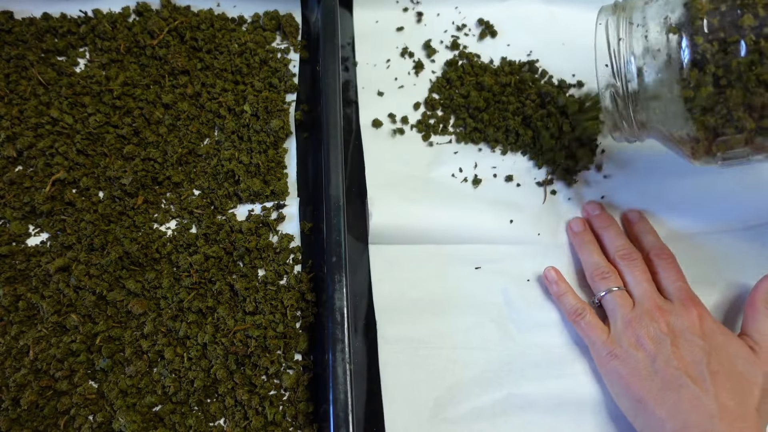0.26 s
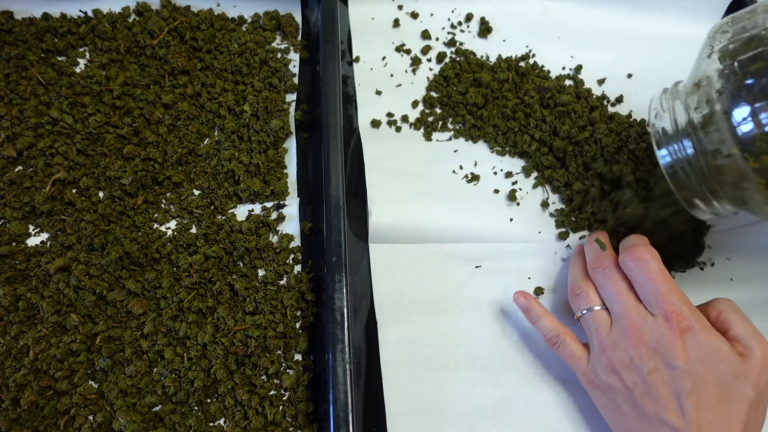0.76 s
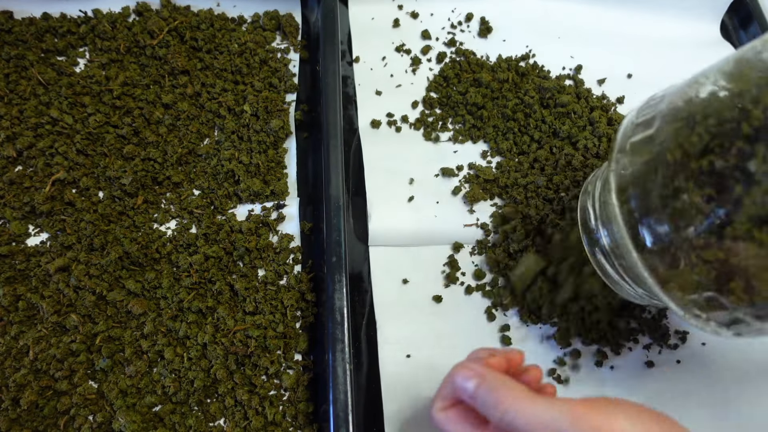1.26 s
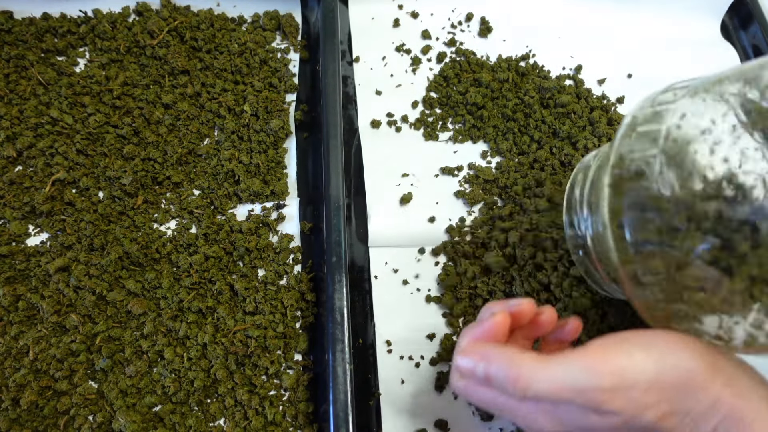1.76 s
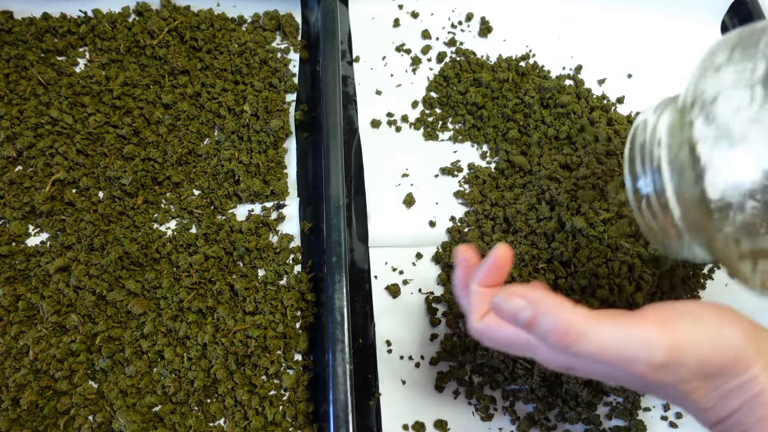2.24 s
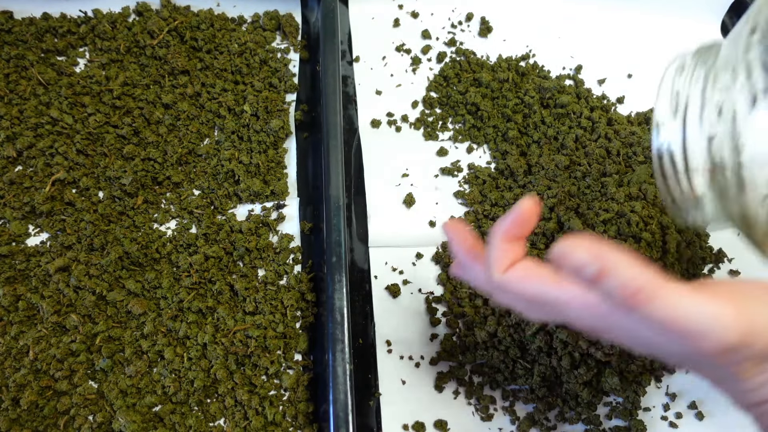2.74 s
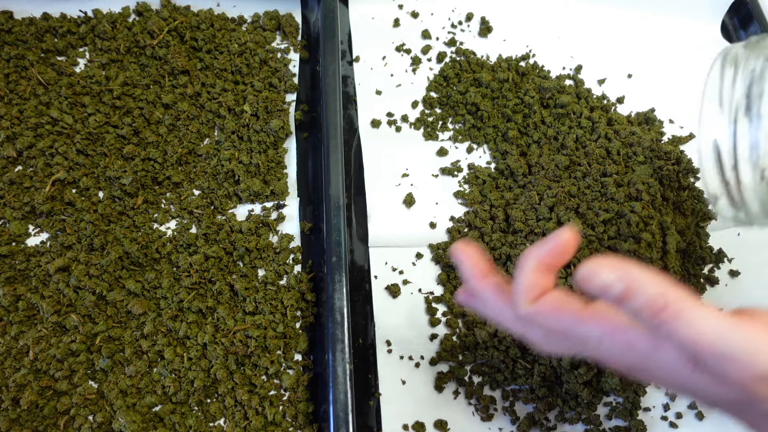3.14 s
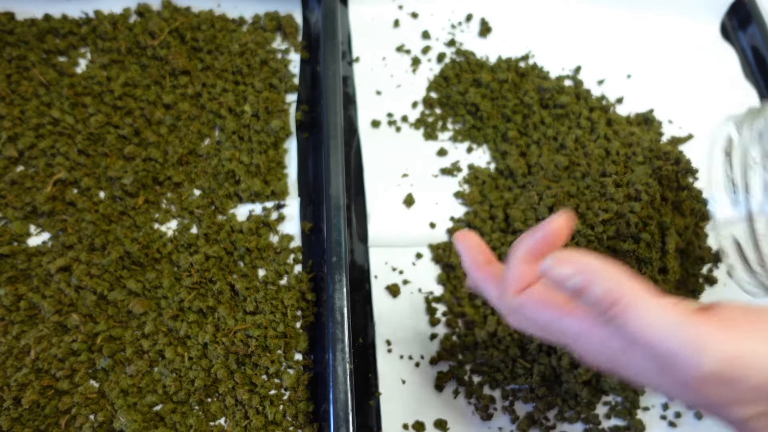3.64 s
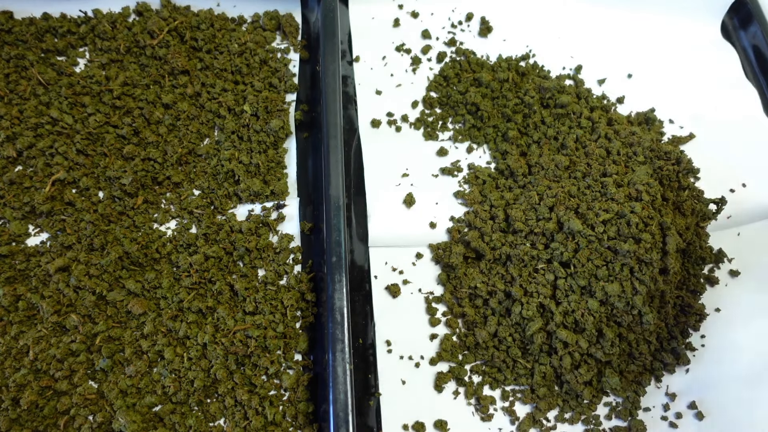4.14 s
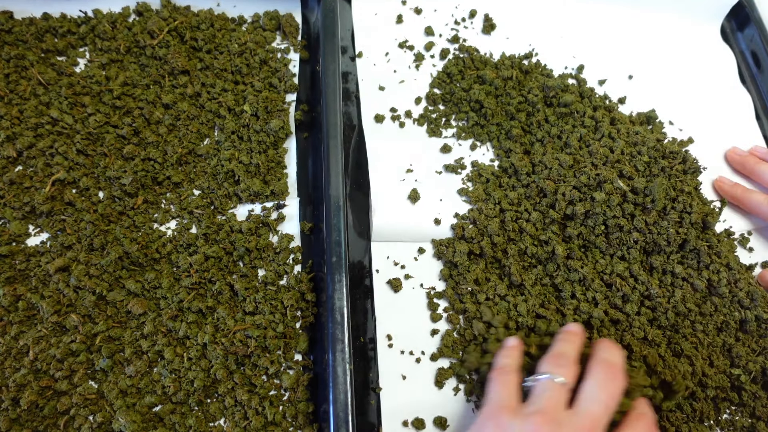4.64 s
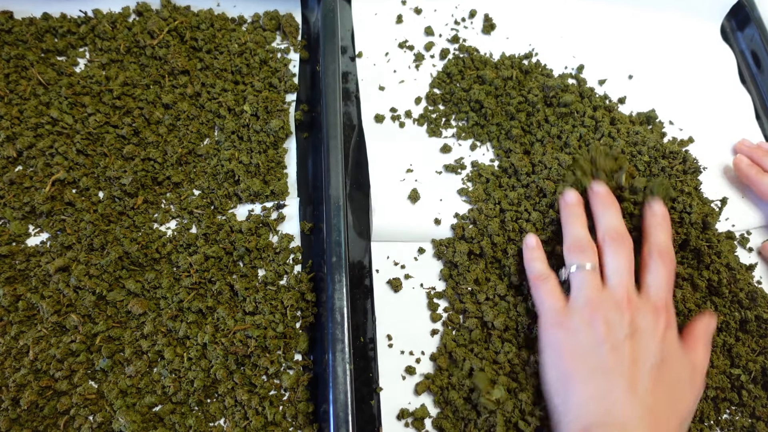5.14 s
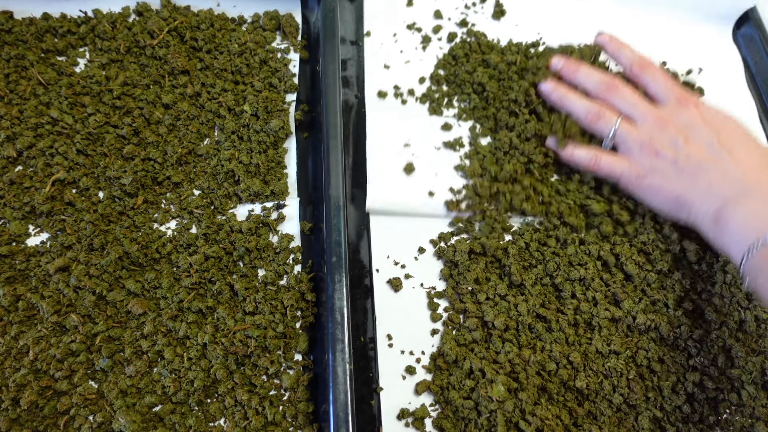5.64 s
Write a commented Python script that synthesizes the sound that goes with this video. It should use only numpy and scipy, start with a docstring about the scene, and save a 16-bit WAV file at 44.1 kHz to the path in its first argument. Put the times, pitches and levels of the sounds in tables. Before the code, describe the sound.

A near microphone catches a brittle rush of leaf crumbs hitting baking paper, fading to a sparse trickle. Rapid, regular low pops follow as a hand beats the jar, with skin ticks, faint ringing and slight rattle. The slaps stop, the tray knocks softly, light crackles follow, then hands sweep the dry heap with growing crunch. Short room echo, almost silent background.

```python
"""Dry crumbled leaves slide out of a glass jar onto baking paper on a tray: banded noise in surges, short snaps.
A palm slaps the jar thirteen times: a smooth pressure pulse with low resonances, a faint modal glass ring.
The jar is put aside and hands spread the heap: later surges, snaps and low tray notes.
Behind: faint whistles, a gliding squeak, short echoes and the coloured noise of a quiet kitchen."""
import sys
import numpy as np
from scipy import signal
from scipy.fft import rfft, irfft, next_fast_len
from scipy.io import wavfile
from scipy.ndimage import uniform_filter1d, map_coordinates

SR = 44100
rng = np.random.default_rng(int(sys.argv[2]) if len(sys.argv) > 2 else 0)


def wrap_up_sound(samples):
    """Save the sound to the file named by the first command line argument, as 16-bit audio."""
    columns = np.atleast_2d(samples).T
    # keep every value between -1 and 1, then stretch to whole-number steps
    tamed = np.clip(columns, -1, 1)
    steps = np.round(tamed * 32767).astype(np.int16)
    wavfile.write(sys.argv[1], SR, steps)


N = 259749


def amp(db):
    """Decibels to linear gain."""
    return 10 ** (np.asarray(db) / 20)


def unit(x):
    """x scaled to rms 1."""
    return x / np.sqrt(np.mean(x ** 2) + 1e-20)


def filtered(x, response):
    """x multiplied in the spectrum by response(hz)."""
    fft_len = next_fast_len(N + SR // 2)
    spectrum = rfft(x, fft_len) * response(np.fft.rfftfreq(fft_len, 1 / SR))
    return irfft(spectrum, fft_len)[..., :N]


def along(points, hz):
    """(hz, value) points interpolated on a log frequency axis."""
    point_hz, value = np.transpose(points)
    return np.interp(np.log(hz + 1), np.log(point_hz + 1), value)


def coloured(x, spectrum):
    """x shaped by a spectrum that is closed outside its end points, rms 1."""
    def response(hz):
        inside = (hz > spectrum[0][0]) & (hz < spectrum[-1][0])
        return amp(along(spectrum, hz)) * inside
    return unit(filtered(x, response))


def patchy(patchy_db):
    """White noise with random gain in short time-frequency patches."""
    z = signal.stft(rng.standard_normal(N + 256), nperseg=256)[2]
    field = uniform_filter1d(rng.standard_normal(z.shape), 5, 0)
    field = uniform_filter1d(field, 6, 1)
    return signal.istft(z * amp(patchy_db * unit(field)), nperseg=256)[1][:N]


def add(out, start_s, sound):
    """Mix sound into out at start_s."""
    i = round(start_s * SR)
    out[i:i + len(sound)] += sound


# surges of sliding leaves: start_s, rise_s, hold_s, fall_s, pitch_hz, crackle_db, paper_db, hiss_db
LEAF_SURGES = [(0.032, 0.12, 0.018, 0.043, 1600, -61, -46.5, -71),
               (0.072, 0.0065, 0.004, 0.024, 1630, -49.5, -39.5, -60),
               (0.112, 0.02, 0.032, 0.32, 1400, -44.5, -35.5, -48.5),
               (0.24, 0.04, 0.077, 0.02, 2850, -39, -48.5, -43.5),
               (0.352, .05, 0.0017, 0.33, 2760, -56, -69, -56.5),
               (0.587, 0.16, 0.033, .05, 2130, -51, -46, -70),
               (0.633, 0.027, 0.013, 0.13, 1730, -38.5, -49.5, -46.5),
               (0.684, 0.017, .003, 0.036, 2660, -41, -43.5, -38.5),
               (0.739, 0.01, 0.0024, 0.041, 5500, -49, -45, -39.5),
               (0.781, 0.15, 0.016, 0.087, 2410, -46.5, -41, -50.5),
               (0.84, 0.12, 0.2, 0.67, 2700, -58, -52.5, -67.5),
               (1.195, 0.15, 0.011, .1, 3770, -50, -53, -58.5),
               (1.35, 0.26, 0.033, 0.073, 5570, -58, -55, -63.5),
               (1.567, 0.18, 0.05, 0.25, 4860, -51.5, -55.5, -57.5),
               (1.816, 0.16, 0.052, 0.31, 5000, -73, -65, -69.5),
               (2.508, .01, .01, 0.069, 4500, -58.5, -73, -64),
               (4.033, .1, 0.088, 0.045, 1600, -57, -53.5, -68.5),
               (4.308, 0.067, .16, 0.15, 1580, -63.5, -61.5, -72),
               (4.64, 0.079, 0.0073, 0.022, 4650, -52, -68, -57),
               (4.682, 0.017, 0.01, 0.12, 4300, -55, -70, -62),
               (4.854, .3, .06, 0.12, 4500, -65.5, -87, -64),
               (4.915, 0.0085, .003, 0.045, 1500, -69, -51.5, -84),
               (5.297, .2, 0.05, 0.21, 2420, -62, -54, -63),
               (5.404, 0.028, .07, 0.076, 3100, -49, -49, -49.5),
               (5.537, 0.044, 0.032, 0.25, 3000, -55, -47, -53),
               (5.622, 0.12, 0.067, 0.077, 2800, -44, -51.5, -41.5),
               (5.777, 0.11, 0.2, .1, 2600, -52, -47.5, -58)]
# steady crumbs: crackle_db, paper_db, hiss_db
TRICKLE_LEVELS_DB = [-72.5, -65.5, -79.5]
SURGE_DB, TRICKLE_HZ = 20, 2600  # level change over rise_s or fall_s; trickle pitch


def flow():
    """Gains of crackle, paper and hiss, and crunch pitch: surge powers add to a steady trickle."""
    t = np.arange(N) / SR
    power = np.ones((3, N)) * amp(TRICKLE_LEVELS_DB)[:, None] ** 2
    log_pitch = power[0] * np.log(TRICKLE_HZ)
    for start_s, rise_s, hold_s, fall_s, pitch_hz, *level_db in LEAF_SURGES:
        before = (start_s - t) / max(rise_s, .002)
        after = (t - start_s - hold_s) / max(fall_s, .002)
        below = np.maximum(np.maximum(before, after), 0)
        surge = (amp(level_db)[:, None] * amp(-SURGE_DB * below)) ** 2
        power = power + surge
        log_pitch = log_pitch + surge[0] * np.log(pitch_hz)
    return np.sqrt(power), np.exp(log_pitch / power[0])  # pitch weighted by crackle power


def grit(per_s, spread_db, length_ms):
    """Tiny landings at random moments: each a gain jump that decays exponentially."""
    size_db = np.minimum(spread_db * rng.exponential(size=N), 3 * spread_db)
    hits = amp(size_db) * (rng.random(N) < per_s / SR)
    return unit(signal.lfilter([1], [1, -np.exp(-1000 / SR / length_ms)], hits))


CRUNCH_DB, CRUNCH_LOG_WIDTH = 4, 0.26


def crunchy(x, pitch_hz):
    """Broad resonance that follows pitch_hz, rms 1."""
    hz, t, z = signal.stft(x, SR, nperseg=256)
    centre_hz = np.interp(t, np.arange(N) / SR, pitch_hz)
    away = np.log((hz[:, None] + 1) / centre_hz) / CRUNCH_LOG_WIDTH
    return unit(signal.istft(z * amp(CRUNCH_DB * np.exp(-away ** 2)), SR, nperseg=256)[1][:N])


# leaf crackle spectrum: freq_hz, level_db_per_hz
CRACKLE_SPECTRUM = [(420, -11), (650, -5), (1000, -8), (1640, -8), (1790, -6), (2580, -3.5), (3470, -6.5),
                    (3850, -7), (6500, -13), (8450, -15), (14300, -120)]
# paper scrape spectrum: freq_hz, level_db_per_hz
PAPER_SPECTRUM = [(120, -50), (200, -14), (350, -1), (500, -4.5), (900, -8.5), (1700, -10.5), (2300, -24),
                  (3700, -90)]
# leaf hiss spectrum: freq_hz, level_db_per_hz
HISS_SPECTRUM = [(2350, -12), (4000, -8), (5120, -4.5), (6370, -2), (8640, -6), (10600, -5.5),
                 (13700, -6.5), (15800, -14.5)]
# tray rumble spectrum: freq_hz, level_db_per_hz
RUMBLE_SPECTRUM = [(20, -14), (45, -4), (80, 4), (150, -1), (260, -6.5), (400, -21)]
# tray rumble envelope: time_s, level_db
TRAY_RUMBLE = [(0, -65), (.2, -59), (.45, -79), (.7, -60.5), (.785, -55), (.95, -68), (1.4, -60),
               (1.75, -65), (2.0, -62), (3.1, -69), (3.94, -61.5), (4.03, -57), (4.082, -46.5),
               (4.15, -57.5), (4.6, -80), (5.15, -68), (5.32, -61), (5.51, -54), (5.57, -63.5), (5.73, -70),
               (5.89, -62)]


def rustle(gains, pitch_hz):
    """Leaf crumbs rain and scrape: patchy noise kicked by grit in leaf and paper bands; the tray rumbles."""
    crackle, paper, hiss = gains
    rumble = amp(np.interp(np.arange(N) / SR, *np.transpose(TRAY_RUMBLE)))
    sparse = 1 / (1 + hiss / amp(-52.5))  # thick flow merges single crumbs into a rush
    crumbs = sparse * grit(per_s=220, spread_db=6.5, length_ms=1.0)  # shared by all leaf bands
    # slow random gain, one knot per 400 samples
    clumps = amp(1.64 * map_coordinates(rng.standard_normal(N // 400 + 4), [np.arange(N) / 400]))
    out = crackle * crunchy(coloured(patchy(1.64), CRACKLE_SPECTRUM), pitch_hz) * (0.66 + 0.39 * crumbs)
    out += hiss * coloured(patchy(1.0), HISS_SPECTRUM) * (0.67 + 0.47 * crumbs)
    softened = uniform_filter1d(crumbs, size=60)
    out += paper * coloured(patchy(1.02), PAPER_SPECTRUM) * (0.46 + 0.14 * softened)
    return clumps * out + rumble * coloured(patchy(2.), RUMBLE_SPECTRUM)


SMALL_OVER_DB, SMALL_SPREAD_DB = 7.5, 6  # relative to the crackle gain
SMALL_HZ, SMALL_TREBLE_DB, SMALL_MS = 2600, -37, 4.8  # median pitch, relative noise, length scale


def small_snaps(crackle, count):
    """Lesser snaps at random moments, their level tied to the crackle around them."""
    start_s = rng.uniform(0, N / SR - .01, count)
    size = rng.exponential(size=count)
    pitch_hz = SMALL_HZ * np.exp(.4 * rng.standard_normal(count))
    level_db = 20 * np.log10(crackle[(start_s * SR).astype(int)])
    level_db += SMALL_OVER_DB + SMALL_SPREAD_DB * (np.minimum(size, 3) - 1)
    return [(s, db, hz, SMALL_TREBLE_DB, SMALL_MS) for s, db, hz in zip(start_s, level_db, pitch_hz)]


# clearest leaf and paper snaps: start_s, level_db, pitch_hz, treble_db (relative), length_ms (scale)
CLEAR_SNAPS = [(0.029, -42, 1640, -24, 2.9), (0.0779, -25.5, 1590, -35, 3.5), (0.1037, -31, 1210, -28, 2.9),
               (0.2097, -32, 2950, -19, 3.1), (0.2272, -27, 2980, -14.5, 2), (0.2732, -28, 2800, -10, 3.3),
               (0.2822, -22.5, 3200, -27, 3), (0.2984, -25, 2430, -22, 3.8),
               (0.3077, -24.5, 2100, -22, 1.7), (0.342, -31, 2660, -12, 2.3),
               (0.3632, -28, 2790, -33.5, 1.4), (0.384, -33, 2870, -16, 2.7), (0.4463, -35, 2780, -27, 2.7),
               (0.4944, -38, 4900, -26, 3.1), (0.5086, -43.5, 1640, -18, 2.3),
               (0.5224, -33.5, 1240, -13, 2.2), (0.53, -29.5, 1870, -40, 1.8), (0.552, -35, 2470, -31, 2.3),
               (0.5756, -25, 2010, -44, 2.9), (0.5966, -29, 1960, -28, 2.3), (0.6272, -22, 1550, -29, 3),
               (0.679, -39, 2300, -16, 2.8), (0.741, -19.5, 5800, -17, 1.7), (0.785, -30, 2600, -22, 3.9),
               (1.0465, -42, 2280, -13, 4.3), (1.0685, -39, 2900, -17, 3.3),
               (1.1342, -34.5, 4150, -31, 1.1), (1.3294, -36, 6500, -28, 1.1),
               (1.3465, -37.5, 3830, -17, 1.7), (1.5595, -30.5, 5370, -33, 2.7),
               (1.7868, -38, 3950, -16.5, 6.9), (1.8544, -51, 2440, -7, 2.6), (1.87, -42.5, 6860, -16, 2.1),
               (2.1932, -48, 3920, -20, 3.7), (2.2665, -46.5, 1300, -8, 2.3),
               (2.5085, -37.5, 6800, -17, 2.5), (2.7437, -37.5, 2680, -25, 2.6),
               (2.787, -40.5, 3100, -28, 2.7), (3.9943, -41, 1560, -32, 2.5), (4.0377, -34, 1720, -25, 2.7),
               (4.09, -38, 3260, -31, 1.9), (4.125, -48, 3300, -29, 3.1), (4.2063, -44, 2260, -37, 3.3),
               (4.387, -42, 2300, -14, 2.1), (4.583, -39.5, 2700, -17, 2.4), (4.6307, -39, 4360, -16, 4),
               (4.6902, -42, 4220, -27, 2.8), (4.7172, -42, 4900, -19, 2.7), (4.795, -43.5, 4890, -31, 3.7),
               (4.8274, -47, 2840, -24, 1.9), (4.8534, -42.5, 4600, -17, 2.3),
               (4.9105, -47, 1530, -15, 1.6), (4.9787, -52.5, 2880, -6, 3.1), (5.0804, -45, 3150, -14, 5.9),
               (5.2883, -23.5, 2510, -23.5, 2.7), (5.3931, -28.5, 3260, -22, 2.5),
               (5.4055, -35, 2720, -17, 2.8), (5.5241, -35, 1160, -12, 3.1),
               (5.6052, -26.5, 7600, -15, 0.84), (5.6237, -39, 2540, -5, 5), (5.6336, -35, 3080, -4, 1.2),
               (5.6659, -25.5, 3090, -12.5, 2.8), (5.6916, -37.5, 3500, -4, 3.2),
               (5.7173, -38, 2750, -2, 1.8), (5.7774, -35.5, 2830, -10, 3.8), (5.7909, -30, 2270, -25, 2.9),
               (5.8107, -20, 2740, -16, 2.6), (5.8539, -33.5, 2550, -9, 3), (5.8693, -29, 2550, -23, 3.5),
               (5.8804, -32.5, 3150, -9, 5.9)]


def snaps(crackle):
    """Each snap is a few cycles of an unsteady tone, stray partials and a spit of broad noise."""
    out, t = np.zeros(N + SR), np.arange(SR // 20) / SR
    for start_s, level_db, hz, treble_db, length_ms in list(CLEAR_SNAPS) + small_snaps(crackle, count=70):
        u = t * 1000 / max(length_ms, .5)
        fade = amp(level_db) * np.sqrt(u) * np.exp(-3.5 * u * u) * 1.075
        wander, spit = rng.standard_normal((2, len(t)))
        phase = 2 * np.pi * hz * t + .14 * np.cumsum(wander)
        ratio = np.array([.7, 1.3, 1.8, 2.6]) * rng.uniform(.85, 1.15, 4)
        ratio = ratio[:, None]
        stray = np.sum(np.sin(ratio * phase) * (ratio * hz < 15000), axis=0)
        tone = np.sin(phase) + 0.26 * stray
        add(out, start_s, fade * (tone + amp(treble_db + 13.0) * spit))
    return out[:N]


# palm on jar: push_s, push_db, lean, glass_low_db, glass_middle_db, glass_high_db, skin_tick_db
PALM_SLAPS = [(1.4143, -26.5, 0.47, -64, -43.5, -42, -32), (1.6005, -39.5, 0.46, -57.5, -74, -60, -52),
              (1.806, -24.5, 0.35, -50.5, -48, -41.5, -43), (2.0014, -20.5, 0.35, -58, -55, -38, -43),
              (2.2152, -22, 0.75, -64, -49, -44.5, -43.5), (2.4095, -24.5, 0.75, -61.5, -60.5, -57, -49),
              (2.6208, -21, 0.97, -61, -54.5, -43, -47.5), (2.819, -25, 0.87, -60, -59, -48, -47),
              (3.024, -20.5, 1.26, -53, -46.5, -41, -38.5), (3.2314, -20, 1.4, -45.5, -44.5, -44, -37),
              (3.4266, -23.5, 1.37, -55, -58, -50, -44), (3.636, -23, 1.5, -52, -61, -50, -45.5),
              (3.8402, -22.5, 1.43, -54.5, -55, -48.5, -43)]
# glass modes: freq_hz, level_db (relative), t60_s, rise_ms
GLASS_MODES = [(2264, -1, .25, 4.), (2282, -8, .2, 2.5), (3138, -3, .085, 1.2), (3825, -1, .055, 1.2),
               (5418, -8, .11, 1.2), (2842, -18, .06, 1.2), (4525, -12, .06, 1.2), (4963, -20, .05, 1.2),
               (6573, -14, .05, .8), (6864, -10, .06, .8), (7117, -12, .06, .8), (7547, -14, .05, .8),
               (7892, -13, .05, .8), (9286, -24, .05, .8), (10020, -20, .04, .8), (10480, -23, .06, .8),
               (11680, -26, .05, .8), (13750, -26, .05, .8)]
# jar air, tray and table resonances: freq_hz, signed_strength_per_s, t60_s
BOOM_MODES = [(78.6, -25, .16), (110, 36, .1), (141, 38, .2), (187, -22, .21), (244, 20, .19),
              (292, 396, .051), (356, 794, .052), (291, 8, .3), (345, 6, .4), (400, 6, .15)]
# table and tray rattle spectrum: freq_hz, level_db_per_hz
KNOCK_SPECTRUM = [(330, -2), (420, -17), (560, 11), (720, -9.5), (1100, -9.5), (1600, -17)]
# skin on glass spectrum: freq_hz, level_db_per_hz
TICK_SPECTRUM = [(400, 9), (900, 3.5), (2500, 8), (4500, -0.5), (7000, 1), (12000, -12), (17000, -2)]
KNOCK_DB, KNOCK_DB_PER_S = -31.5, 3  # rattle re push; grows over time as the jar empties
PUSH_MS, SOFTER_MS_PER_DB, USUAL_PUSH_DB = 1.68, 0.08, -22.5  # a softer slap is slower
CONTACT_LEAD_S, KNOCK_LEAD_S = .0058, .003  # before the push centre


def slaps():
    """The palm sucks, pushes and rebounds; resonances boom, skin ticks and glass modes ring."""
    air, glass, skin, shake = np.zeros((4, N + SR))
    near_ms = np.arange(-441, 441) / SR * 1000
    t = np.arange(SR // 4) / SR
    for push_s, push_db, lean, low_db, middle_db, high_db, tick_db in PALM_SLAPS:
        width_ms = PUSH_MS + SOFTER_MS_PER_DB * (USUAL_PUSH_DB - push_db)
        u = near_ms / width_ms * np.where(near_ms < 0, 1.24, 1)
        push = (1 - u * u + lean * u) * np.exp(-u * u / 2)  # acceleration and speed of a smooth dent
        add(air, push_s - 441 / SR, amp(push_db) * push)
        for hz, mode_db, t60_s, rise_ms in GLASS_MODES:
            # palm position sets the mode family levels
            family_db = low_db if hz < 2500 else middle_db if hz < 6000 else high_db
            decay = amp(family_db + mode_db + rng.normal(0, 1.5) - 60 * t / t60_s)
            rise = 1 - np.exp(-1000 * t / rise_ms)
            # the holding hand blurs each pitch
            shiver = hz / 4e5 * np.cumsum(rng.standard_normal(len(t)))
            add(glass, push_s - CONTACT_LEAD_S, decay * rise * np.sin(2 * np.pi * hz * t + shiver))
        tick_fade = amp(-60 * t / 0.0098) + 0.086 * amp(-60 * t / 0.34)
        add(skin, push_s - CONTACT_LEAD_S, amp(tick_db) * tick_fade)
        knock_db = push_db + KNOCK_DB + KNOCK_DB_PER_S * (push_s - PALM_SLAPS[0][0])
        add(shake, push_s - KNOCK_LEAD_S, amp(knock_db - 60 * t / 0.055) * (1 - np.exp(-t / 0.00031)))
    lag = np.arange(SR // 2) / SR
    boom = sum(strength / SR * amp(-60 * lag / t60_s) * np.cos(2 * np.pi * hz * lag)
               for hz, strength, t60_s in BOOM_MODES)
    # the tray returns the push 7.6 ms later, inverted and duller
    back = filtered(air[:N], lambda hz: -np.exp(-2j * np.pi * hz * .0076 - (hz / 158) ** 2))
    knock = shake[:N] * coloured(rng.standard_normal(N), KNOCK_SPECTRUM)
    tick = skin[:N] * coloured(rng.standard_normal(N), TICK_SPECTRUM)
    thump = air[:N] + back + knock + signal.fftconvolve(air, boom)[:N]
    return thump, glass[:N] + tick


# tray nudges: start_s, level_db, pitch_hz, t60_s
TRAY_BUMPS = [(0.761, -35, 90, .05), (3.995, -34.5, 191, 0.062), (0.844, -38.5, 79, 0.27),
              (4.074, -61, 118, 0.094), (4.196, -24.5, 124, 0.025), (5.511, -23.5, 69.4, 0.034)]


def bumps():
    """The tray answers a nudge with one dull, decaying low note."""
    out, t = np.zeros(N + SR), np.arange(SR // 4) / SR
    for start_s, level_db, hz, t60_s in TRAY_BUMPS:
        fade = amp(level_db - 60 * t / t60_s) * (1 - np.exp(-t / 0.0095))
        add(out, start_s, fade * np.sin(2 * np.pi * hz * t))
    return out[:N]


# sliding paper whistles: start_s, end_s, pitch_hz, width_hz, level_db
PAPER_WHISTLES = [(.84, 1.1, 2850, 140, -69), (4.52, 5.02, 2820, 110, -71), (4.37, 4.46, 345, 20, -67),
                  (5.575, 5.66, 10550, 120, -54)]


def whistles():
    """Sliding paper whistles: narrow noise bands that swell and fade."""
    out, t = np.zeros(N), np.arange(N) / SR
    for start_s, end_s, pitch_hz, width_hz, level_db in PAPER_WHISTLES:
        swell = np.sin(np.pi * np.clip((t - start_s) / (end_s - start_s), 0, 1)) ** .5
        band = filtered(rng.standard_normal(N), lambda hz: np.exp(-((hz - pitch_hz) / width_hz) ** 2))
        out += amp(level_db) * swell * unit(band)
    return out


# squeak glide: time_s, pitch_hz
SQUEAK_GLIDE = [(3.556, 11400), (3.572, 12200), (3.586, 12400), (3.605, 11500), (3.628, 10900)]


def squeak():
    """A very faint high sine glide between two slaps."""
    t, (time_s, pitch_hz) = np.arange(N) / SR, np.transpose(SQUEAK_GLIDE)
    swell = np.sin(np.pi * np.clip((t - time_s[0]) / (time_s[-1] - time_s[0]), 0, 1)) ** .5
    return amp(-73) * swell * np.sin(2 * np.pi * np.cumsum(np.interp(t, time_s, pitch_hz)) / SR)


# kitchen reverberation: freq_hz, t60_s
ROOM_DECAY = [(300, 0.49), (700, 0.68), (3000, 0.26), (12000, 0.17)]


def room(x):
    """Kitchen echo: a noise tail in which each frequency decays at its own rate."""
    hz, t, z = signal.stft(rng.standard_normal(SR // 3), SR, nperseg=256)
    decay = amp(-60 * t / along(ROOM_DECAY, hz)[:, None])
    tail = signal.istft(z * decay, SR, nperseg=256)[1]
    delayed = np.pad(x, (200, 0))  # samples
    return signal.fftconvolve(delayed, tail / np.linalg.norm(tail))[:N]


# quiet kitchen spectrum: freq_hz, level_db_per_hz
KITCHEN_SPECTRUM = [(13, -32), (22, 10.5), (64, -0.5), (235, -2.5), (335, 3), (396, -8.5), (582, -4.5),
                    (787, -8.5), (2060, -10), (2300, -12), (4710, -20.5), (7110, -20.5), (8620, -21),
                    (13800, -24), (15800, -27)]


def kitchen():
    """Quiet kitchen hum: patchy noise in a fixed, bass-heavy spectrum."""
    return amp(-63) * coloured(patchy(3.0), KITCHEN_SPECTRUM)


def scene():
    """Sum of all sources and echoes; the thump is a trace louder on the right."""
    thump, glass = slaps()
    gains, pitch_hz = flow()
    clicks = glass + snaps(gains[0])
    leaves = rustle(gains, pitch_hz)
    echo = amp(-13) * room(clicks)
    # deep bass gets little echo
    echo += amp(-18.5) * filtered(room(thump), lambda hz: 1 / (1 + (230 / (hz + 1)) ** 4))
    mid = thump + clicks + echo + leaves + bumps() + whistles() + squeak() + kitchen()
    return mid + 0.011 * thump * np.array([[-1], [1]])


# faint stereo hiss spectrum: freq_hz, level_db_per_hz
SIDE_HISS_SPECTRUM = [(20, 1.5), (400, -9), (800, -13.5), (1400, -27), (2500, -31.5), (4500, -23.5),
                      (8000, -17.5), (15800, -15.5)]
SHELF_HZ, SHELF_DB, TOP_HZ = 15800, -32, 16688


def record(dry):
    """Adds faint hiss in opposite polarity left and right, drops the top treble, cuts all from TOP_HZ up."""
    hiss = amp(-79) * coloured(rng.standard_normal(N), SIDE_HISS_SPECTRUM) * np.array([[1], [-1]])
    return filtered(dry + hiss, lambda hz: (hz < TOP_HZ) * np.where(hz > SHELF_HZ, amp(SHELF_DB), 1))


dry = scene()
out = record(dry)
wrap_up_sound(out)
```